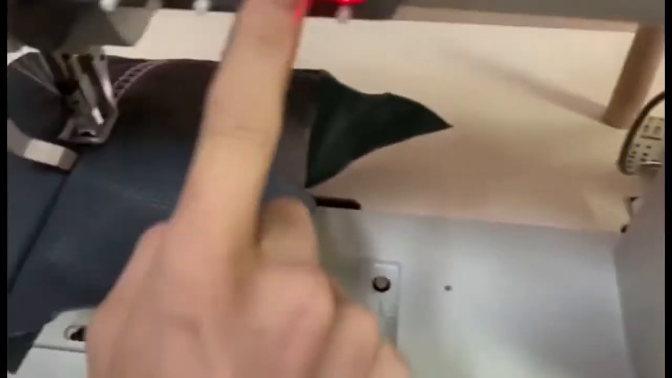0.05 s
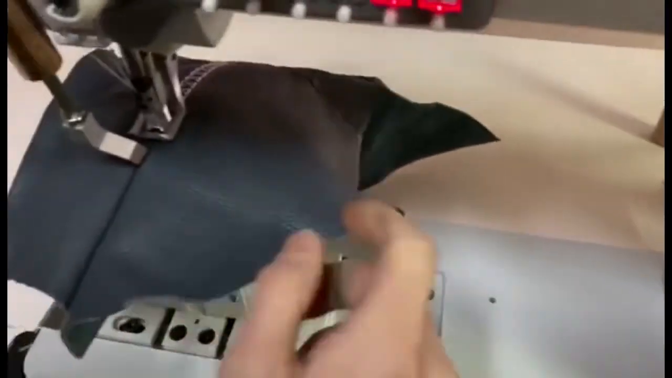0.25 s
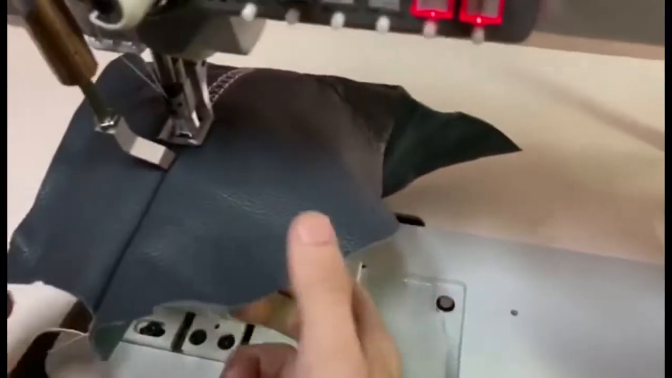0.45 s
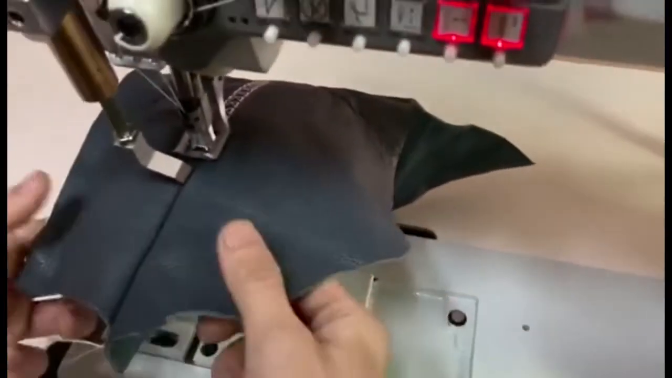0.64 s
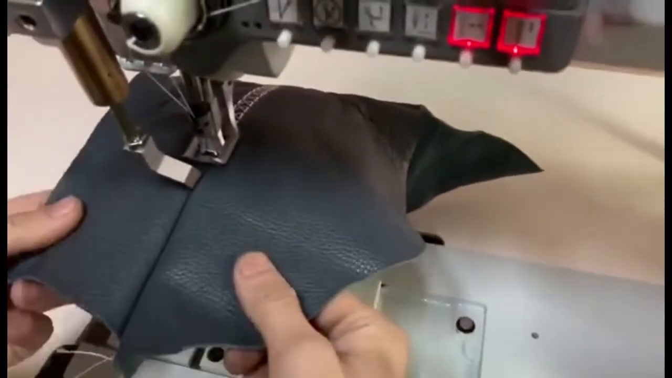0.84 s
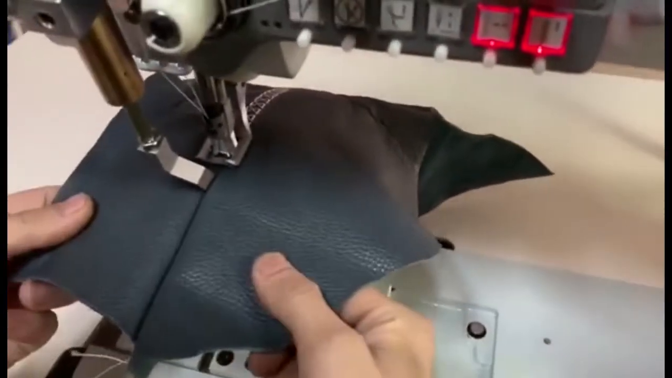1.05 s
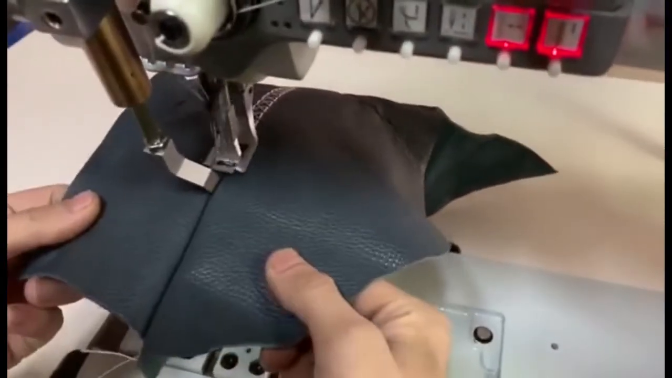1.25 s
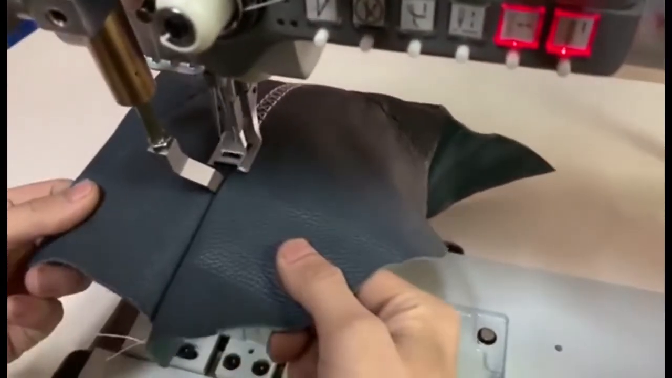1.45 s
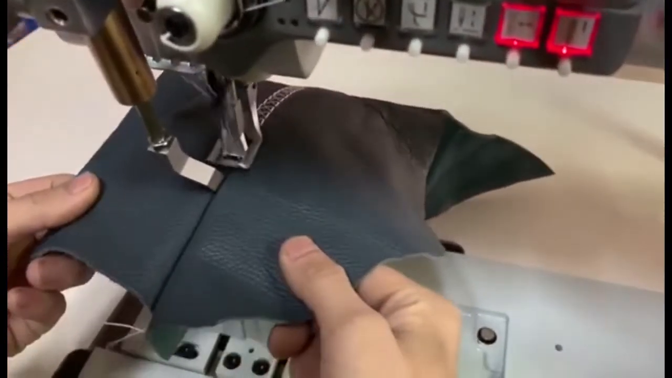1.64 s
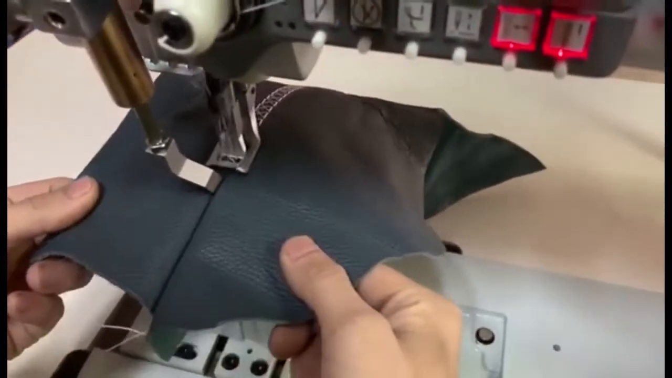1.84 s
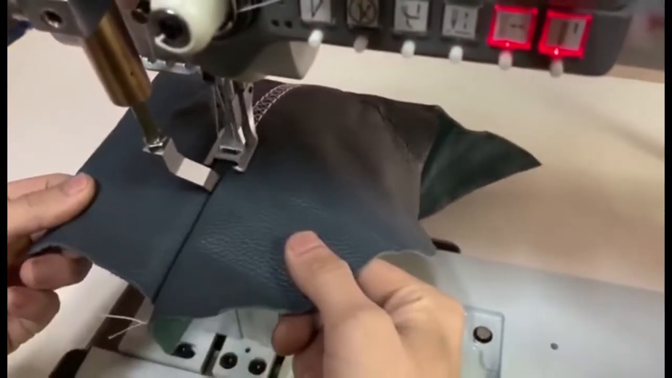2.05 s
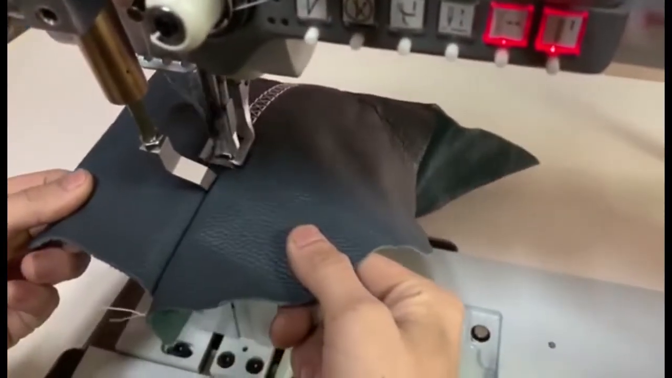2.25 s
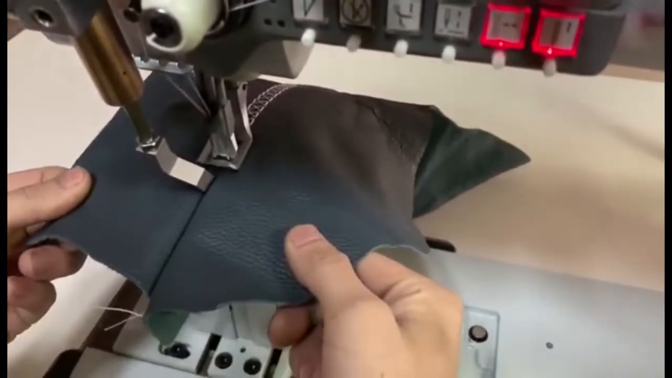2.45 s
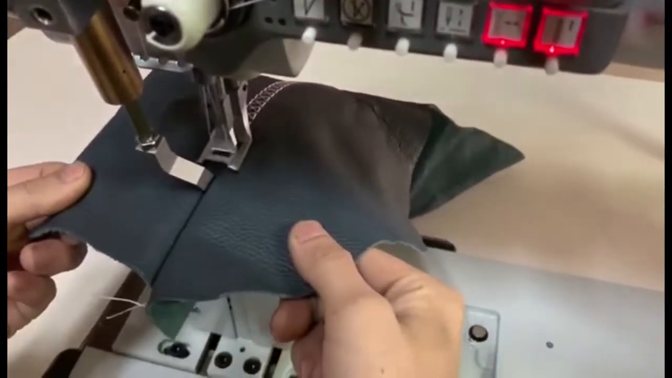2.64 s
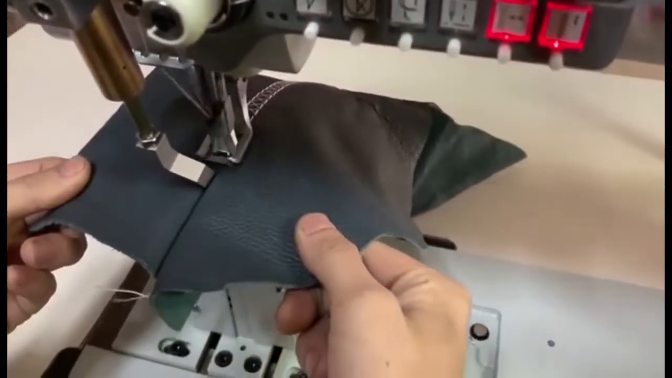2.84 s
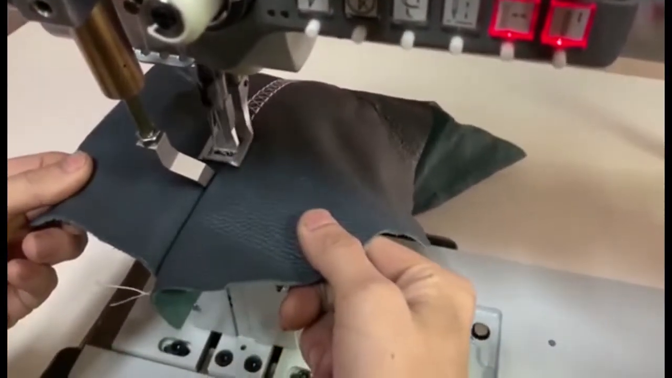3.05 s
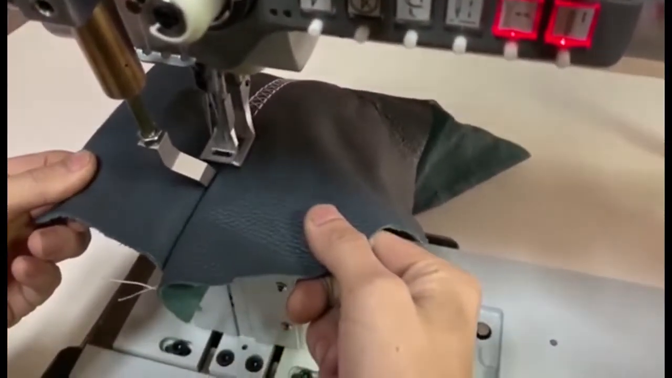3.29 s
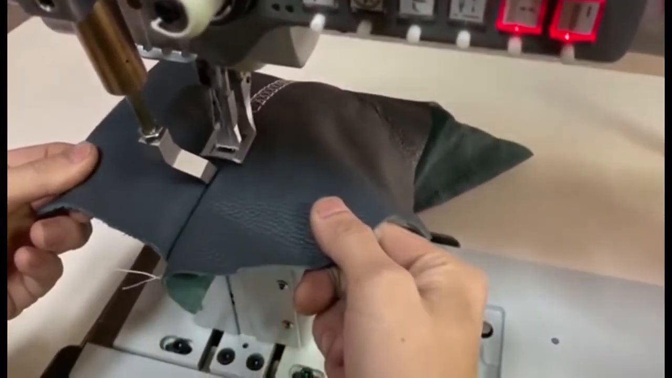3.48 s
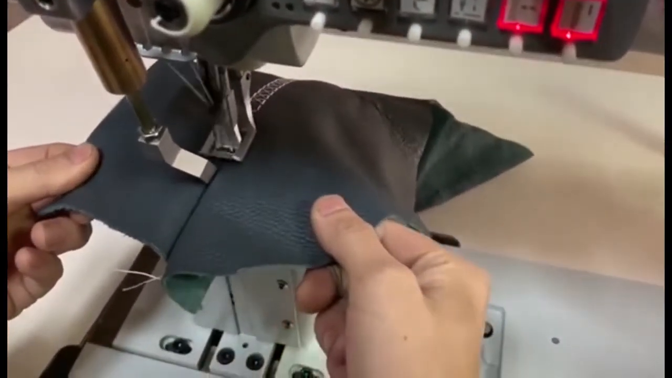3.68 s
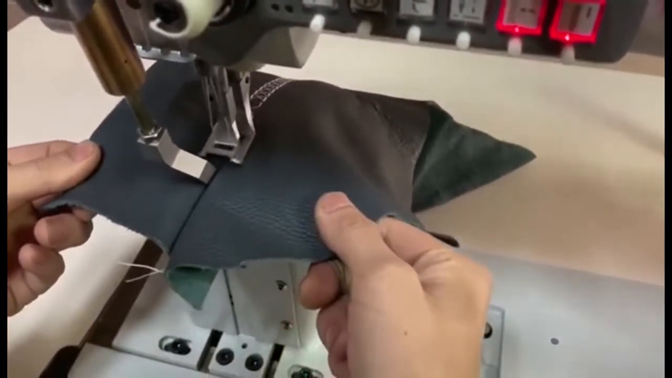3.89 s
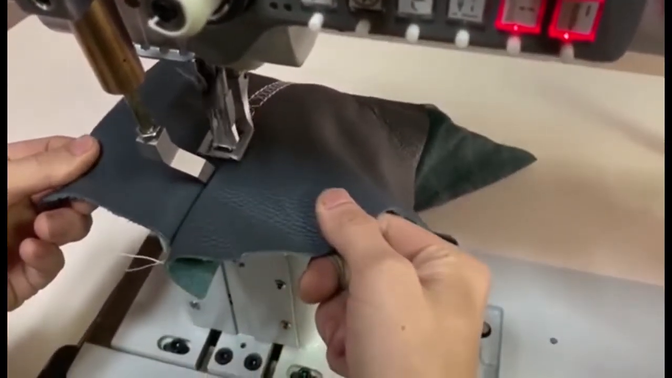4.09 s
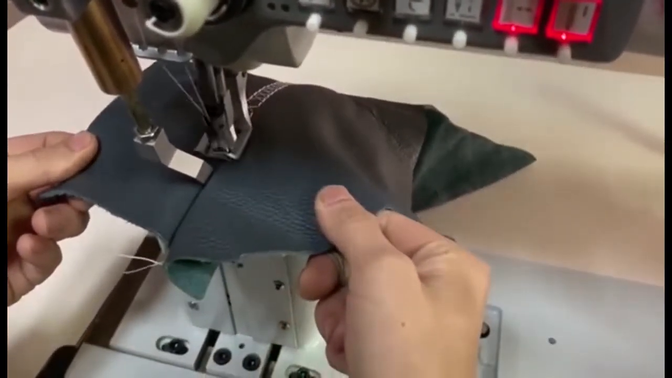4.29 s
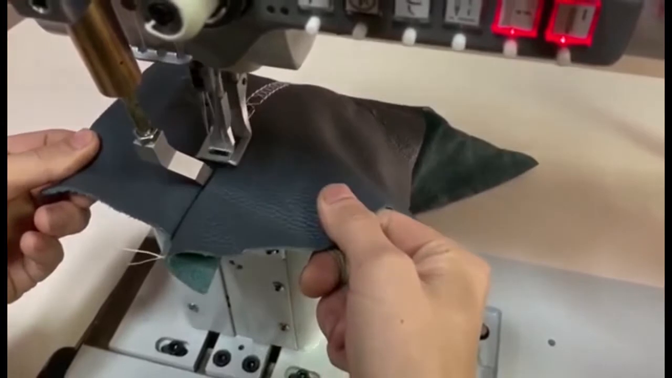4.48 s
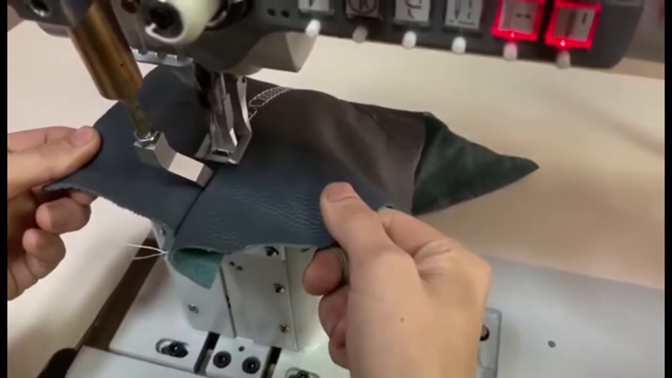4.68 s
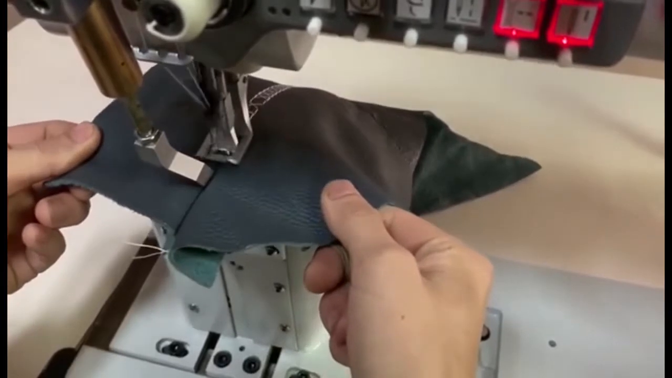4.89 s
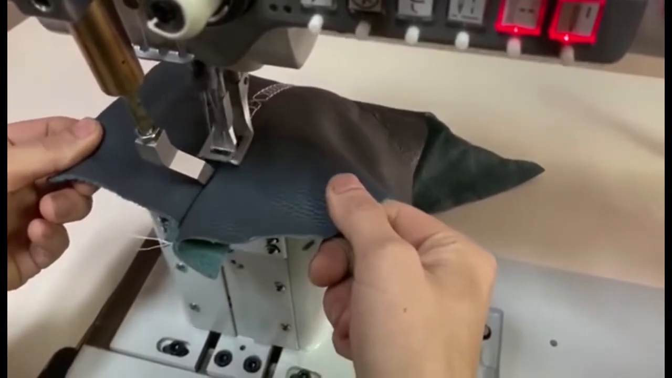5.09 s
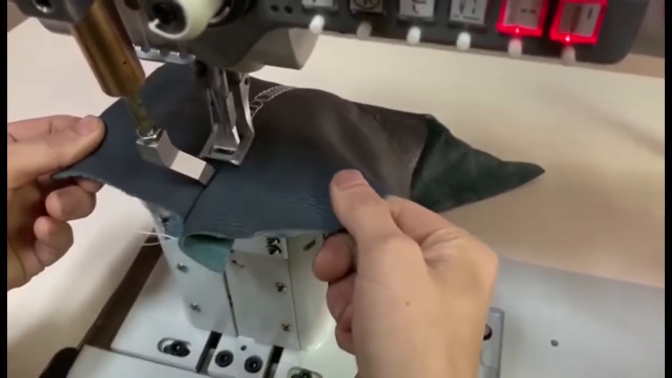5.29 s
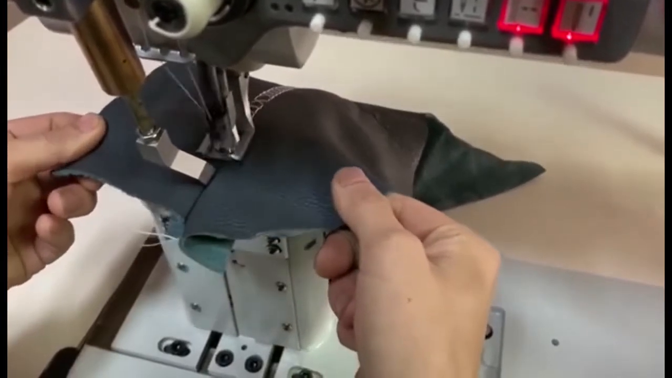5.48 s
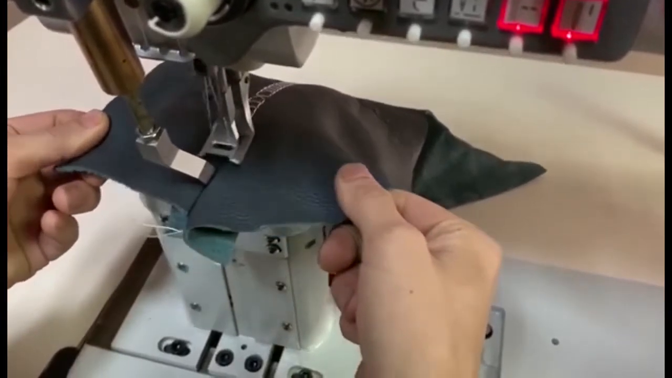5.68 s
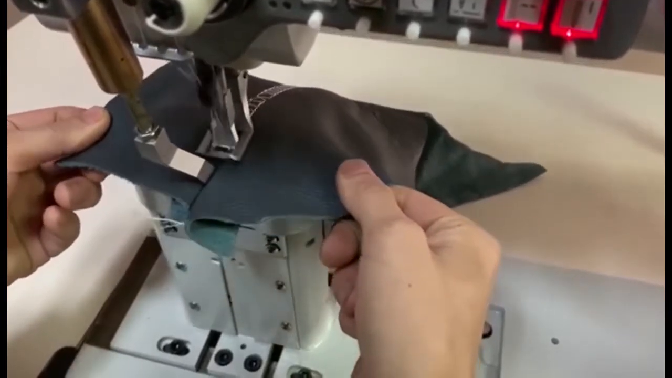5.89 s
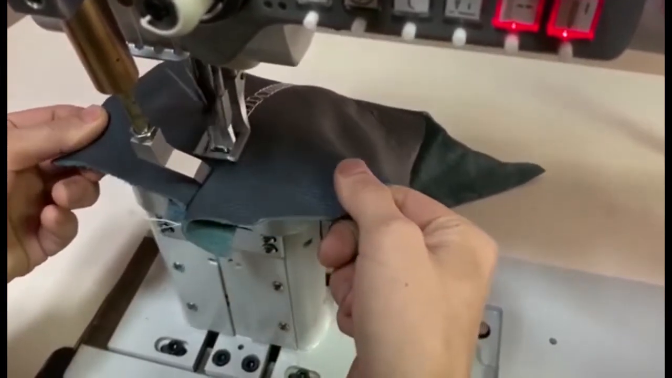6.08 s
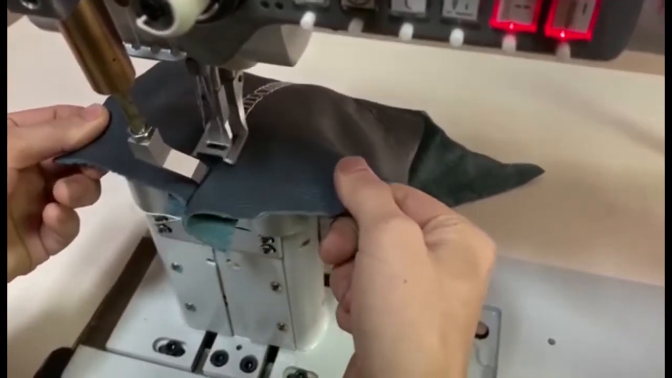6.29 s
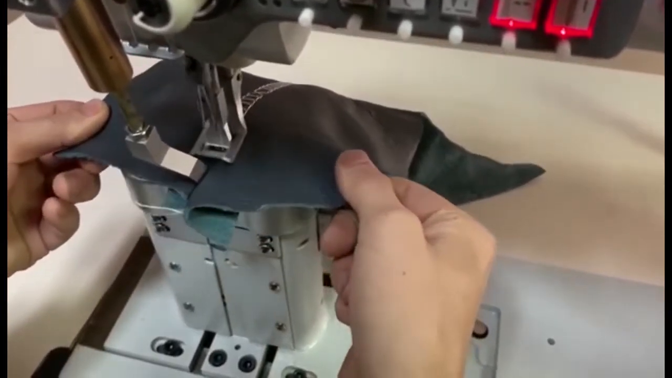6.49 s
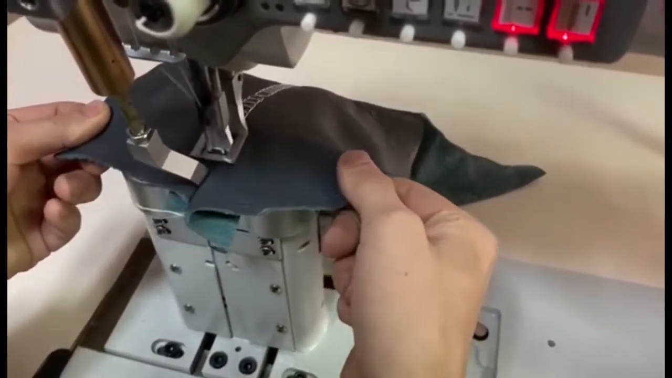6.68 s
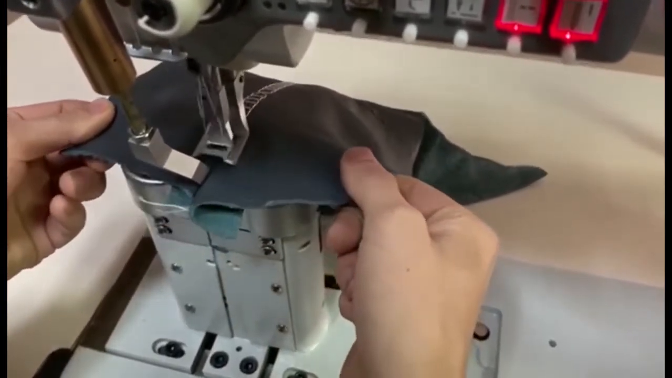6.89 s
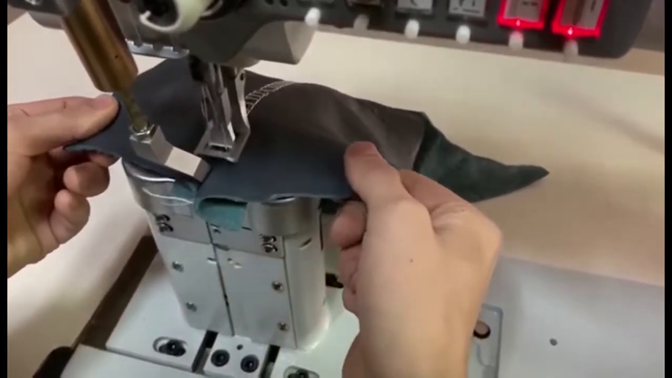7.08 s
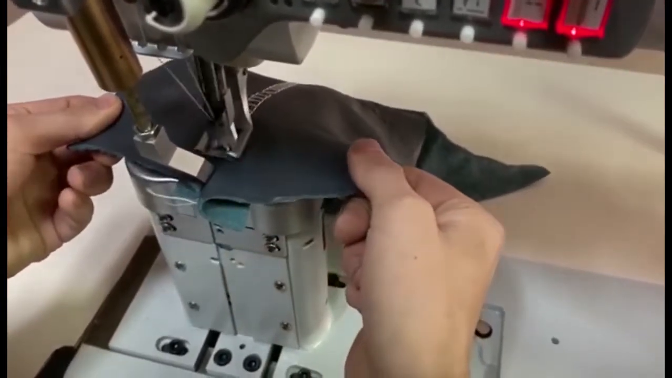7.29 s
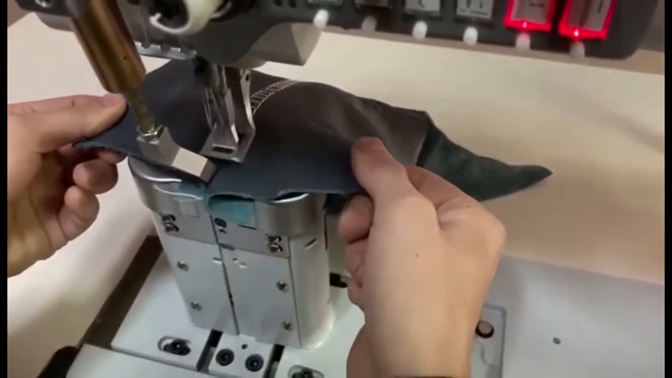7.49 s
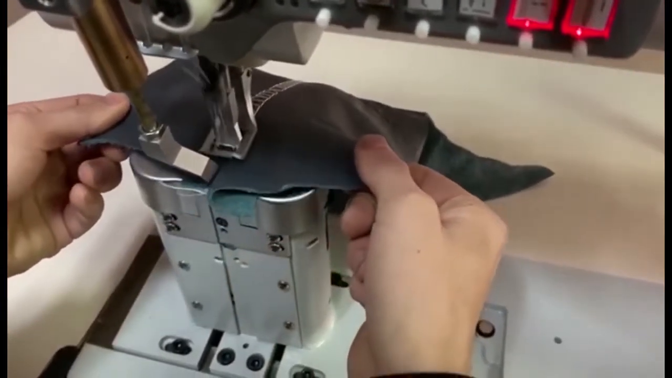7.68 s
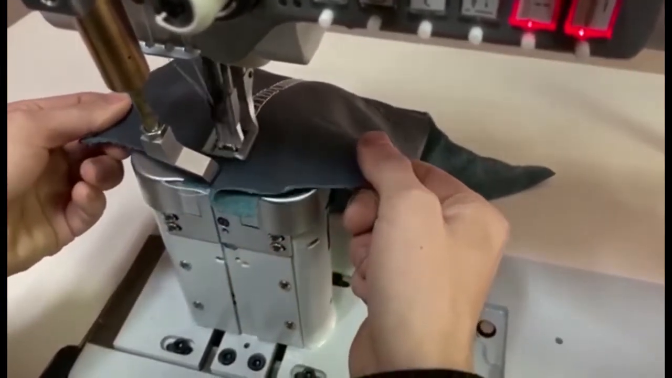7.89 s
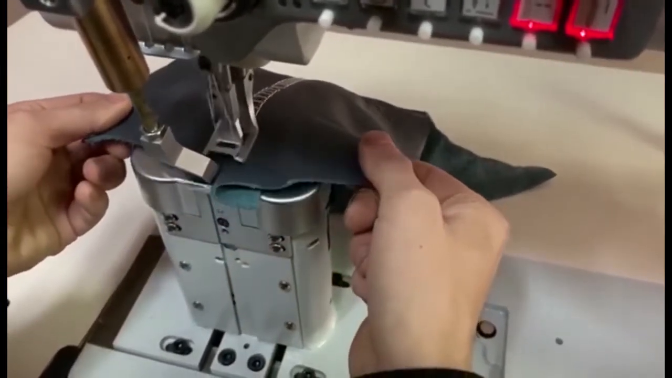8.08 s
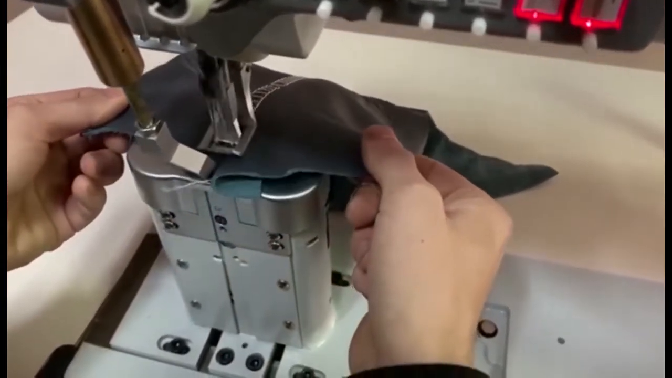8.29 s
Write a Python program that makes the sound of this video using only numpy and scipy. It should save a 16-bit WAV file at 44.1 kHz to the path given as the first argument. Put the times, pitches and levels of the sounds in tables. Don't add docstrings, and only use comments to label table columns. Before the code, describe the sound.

A heavy sewing machine drones, then stitches leather slowly and evenly, each turn a sharp metal click, a gritty needle punch and a hissing scrape.

```python
import sys
import numpy as np
from scipy import signal
from scipy.fft import rfft, irfft
from scipy.io import wavfile
from scipy.ndimage import uniform_filter1d

SR = 44100
rng = np.random.default_rng(int(sys.argv[2]) if len(sys.argv) > 2 else 0)


def put_to_file(sound):
    columns = np.atleast_2d(sound).T
    safe = np.clip(columns, -1, 1)
    whole_steps = np.round(safe * 32767)
    wavfile.write(sys.argv[1], SR, whole_steps.astype(np.int16))


def gain_from_decibels(decibels):
    exponent = np.asarray(decibels, float) / 20
    return 10 ** exponent


N = 367794

# (start [s], punch [dB], punch hiss over punch [dB], hook [dB], hook hiss over hook [dB])
TURNS = [(0.7655, -46, -11.5, -21.5, -8.5), (1.3662, -14, -13, -23.5, -7.5),
         (1.9643, -16.5, -11.6, -22.5, -6), (2.5652, -15.5, -12.5, -21.6, -8),
         (3.1654, -15, -13, -21.5, -7.5), (3.7662, -16, -11, -21, -8.5), (4.3653, -17.5, -10.1, -23, -8),
         (4.967, -16, -12.1, -22.5, -7.5), (5.5668, -17, -10, -21.5, -10), (6.1676, -18, -8, -20.5, -10.5),
         (6.767, -16, -10, -23, -6.5), (7.3682, -17, -11, -22, -9), (7.9684, -15.5, -11, -34.5, -0.5)]
# (frequency [Hz], width [Hz], level [dB])
HOOK_HISS = [(5040, 490, -14.5), (5780, 420, -4), (6450, 330, -4), (7290, 310, 2.5)]
# (time [s], drone [dB], rumble [dB], workshop wash [dB], gear whirr [dB])
RUNNING = [(0.0, -33.5, -25, -30.5, -44), (0.25, -35.5, -27, -34, -52.5), (0.44, -24, -24.5, -27, -42.5),
           (0.56, -30, -25, -28, -44), (0.67, -23, -30.5, -30, -53.5), (0.72, -33.5, -26.5, -29.5, -48.5),
           (0.97, -35, -29, -36, -54), (1.09, -28, -25, -30, -41.5), (1.28, -27, -23.5, -28.5, -38.5),
           (1.46, -28.5, -20, -24, -37), (1.51, -31.5, -19.5, -27.5, -39.5), (1.74, -25.5, -21, -29.5, -44),
           (1.92, -33.5, -26, -33.5, -44), (1.97, -28.5, -21, -27.5, -36.5),
           (2.14, -33.5, -20.5, -31.5, -44), (2.23, -22, -23, -26, -44), (2.42, -36, -23, -30, -40.5),
           (2.51, -24.5, -22.5, -29.5, -37), (2.69, -23.5, -23, -27.5, -42), (3.04, -28, -21.5, -31.5, -43),
           (3.11, -23.5, -29, -28, -41.5), (3.32, -25.5, -26.5, -29.5, -42),
           (3.39, -19.5, -25, -28.5, -41.5), (3.55, -31.5, -19, -29.5, -40.5), (3.69, -23, -21, -29, -40.5),
           (3.83, -30.5, -24, -27.5, -38), (4.02, -21.5, -25, -28, -40.5), (4.25, -29, -24, -29.5, -42),
           (4.62, -27, -22.5, -28, -41), (4.88, -30, -24, -27.5, -40), (5.04, -27, -23, -26, -41),
           (5.29, -33.5, -23.5, -31, -43), (5.46, -31, -31.5, -27.5, -40), (5.87, -29, -20, -30, -41),
           (5.94, -38.5, -22.5, -28.5, -46.5), (6.06, -29.5, -24, -31.5, -42.5),
           (6.15, -38, -21.5, -25.5, -38), (6.2, -22, -21, -28.5, -40), (6.37, -36, -23, -29.5, -42),
           (6.43, -21.5, -24, -32, -46), (6.5, -36.5, -24, -28, -43), (6.57, -30, -26.5, -35.5, -45),
           (6.67, -39, -22, -31, -42.5), (6.88, -33, -23, -29.5, -41), (7.02, -21, -23, -27.5, -44),
           (7.22, -33, -22, -30, -40), (7.43, -30, -19, -26.5, -39), (7.55, -38, -23.5, -30, -43),
           (7.62, -21.5, -22, -31, -42.5), (7.85, -38.5, -23, -30.5, -41.5), (8.01, -24.5, -21, -27, -40),
           (8.13, -37, -23.5, -33.5, -39), (8.22, -21, -21.5, -26, -42), (8.34, -30, -22, -29.5, -42)]


def evened(x):
    return x / np.sqrt(np.mean(x ** 2) + 1e-20)


def read(points, hz):
    f, value = np.transpose(points)
    return np.interp(np.log(hz + 1), np.log(f + 1), value)


def add(mix, s, sound):
    part = mix[..., round(s * SR):][..., :sound.shape[-1]]
    part += sound[..., :part.shape[-1]]


def ring(x, modes, skirt_db=-60, lo_hz=400, hi_hz=7700):
    hz = np.fft.rfftfreq(x.shape[-1], 1 / SR)
    response = 0
    for k, (f, width, db) in enumerate(modes):
        response = response + (-1) ** k * gain_from_decibels(db) / (1 + 2j * (hz - f) / width)
    skirt = 1j * hz / lo_hz / (1 + 1j * hz / lo_hz) / (1 + 1j * hz / hi_hz)
    response = response + gain_from_decibels(skirt_db) * skirt
    response = response / (1 + (lo_hz / (hz + 1)) ** 4) / (1 + (hz / hi_hz) ** 4)
    response = response / np.sqrt(np.mean(abs(response) ** 2))
    return irfft(rfft(x) * response, x.shape[-1])


def ports(pair, same, right_db=0.):
    # (frequency [Hz], lead [radians])
    lead = [(0, -1.5), (340, 1), (950, 0.5), (1380, 3.5), (1810, 4), (2760, 10), (3530, 11.5), (3960, 15),
            (4220, 13.5), (5000, 14), (6030, 19.5), (6370, 17.5), (6720, 21), (7320, 17)]
    hz = np.fft.rfftfreq(pair.shape[-1], 1 / SR)
    likeness = np.clip(same if np.isscalar(same) else read(same, hz), 0, 1)
    left, other = rfft(pair)
    later = left * np.exp(-1j * np.interp(hz, *np.transpose(lead)))
    right = likeness * later + np.sqrt(1 - likeness ** 2) * other
    return np.array([pair[0], gain_from_decibels(right_db) * irfft(right, pair.shape[-1])])


def rattle(grit_db):
    unevenness = np.minimum(rng.exponential(1, N), 4)
    return evened(rng.standard_normal((2, N)) * gain_from_decibels(grit_db * unevenness))


def contacts(rows, body_db, hiss_db, loose_db, loose_s):
    power = np.zeros((2, N))
    t = np.arange(-.06, .12, 1 / SR)
    for turn, body, hiss in zip(TURNS, body_db, hiss_db):
        chance = rng.standard_normal((len(rows), 2))
        for (delay, b, h, rise, fall), (louder, later) in zip(rows, chance):
            shape = np.exp(np.where(t < 0, t / rise, -t / fall))
            level = np.array([[body + b], [hiss + h]]) + loose_db * louder
            start = turn[0] + delay + t[0] + loose_s * later
            add(power, start, (gain_from_decibels(level) * shape) ** 2)
    return np.sqrt(power)


def needle_punch():
    # (delay [s], body [dB], hiss [dB], rise time [s], fall time [s])
    contact_rows = [
        (.236, -17, -10, 0.0036, 0.0094),
        (.254, -3, -2, .005, 0.011),
        (.270, 3.5, 0, .004, .009),
        (.29, -10, -14.5, 0.0069, 0.023),
    ]
    # (frequency [Hz], width [Hz], level [dB])
    head = [(572, 34, -6), (1493, 57, -4), (1734, 36, -6.5), (1985, 26, -7.5), (2486, 23, -9),
            (2938, 41, -6.5), (3275, 46, -11.5), (3460, 77, -15.5), (3806, 56, -15.5), (4300, 41, -17.5)]
    # (frequency [Hz], width [Hz], level [dB])
    hiss_modes = [(5400, 150, 0), (6450, 160, 1.5), (7250, 550, -7.5)]
    _, punch, hiss_over, _, _ = np.transpose(TURNS)
    body, hiss = contacts(contact_rows, punch, punch + hiss_over, loose_db=1.0, loose_s=.001)
    knock = ring(body * rattle(3.), head, -17.5, 450, 4010)
    return knock + ring(hiss * rattle(2.4), hiss_modes, -24.5, 4200, 9000)


def hook_scrape():
    # (delay [s], body [dB], hiss [dB], rise time [s], fall time [s])
    contact_rows = [
        (.374, -9.5, -5, .003, 0.0093),
        (.394, 1.5, 2.5, 0.0078, .004),
        (.401, 2.5, 2.5, .002, .008),
    ]
    # (frequency [Hz], width [Hz], level [dB])
    head = [(960, 160, -2), (1705, 52, 4.5), (1880, 17, -6), (2480, 60, -0.5), (3540, 82, -7.5)]
    _, _, _, hook, hiss_over = np.transpose(TURNS)
    body, hiss = contacts(contact_rows, hook, hook + hiss_over, loose_db=0.0, loose_s=0.0011)
    scrape = ring(body * rattle(3.4), head, -9, 1200, 3700)
    return scrape + ring(hiss * rattle(3.3), HOOK_HISS, -15, 4200, 9000)


def linkage_ticks():
    # (delay [s], body [dB], hiss [dB], rise time [s], fall time [s])
    contact_rows = [(.024, -28.5, -40.5, 0.0014, 0.011), (.092, -37.5, -44.5, 0.0046, .004),
                    (.101, -34.5, -39.5, 0.0018, .008), (.128, -30.5, -41, .002, 0.0085),
                    (.170, -35.5, -41, 0.0027, .008), (.207, -54.5, -46.5, 0.0011, 0.0034),
                    (.325, -48, -41.5, .002, 0.0065), (.474, -48, -48, 0.011, .003),
                    (.545, -36, -40, 0.01, 0.022), (.566, -29.5, -36, 0.0012, .005)]
    # (frequency [Hz], width [Hz], level [dB])
    rods = [(1720, 93, -1), (2033, 120, -3), (2730, 130, -9.5), (3340, 270, -10)]
    start = np.transpose(TURNS)[0]
    level = np.where(start < 1.2, -9., 0.)
    body, hiss = contacts(contact_rows, level, level, loose_db=1.0, loose_s=0.0013)
    moving = np.arange(N) > 1.05 * SR
    tick = ring(moving * body * rattle(4.3), rods, -13.5, 1200, 4600)
    return tick + ring(moving * hiss * rattle(3.9), HOOK_HISS, -4.5, 4200, 7600)


def mechanism():
    return gain_from_decibels(3.0) * ports(needle_punch() + hook_scrape() + linkage_ticks(), 0.67, right_db=1.14)


def clicks():
    # (time [s], peak [dB], ring [Hz], low ring over ring [dB], hiss over ring [dB], left over right [dB])
    events = [(1.054, -31.5, 3410, -16, -6.5, -2), (1.387, -33.5, 3330, -8, -9, -5.5),
              (1.9657, -6.5, 3240, -8.5, -31, -2), (2.5639, -9, 3420, -12, -25, 3.5),
              (3.1662, -11.5, 3400, -13, -21.5, 2), (3.7652, -11, 3360, -13, -20, -7),
              (4.367, -10.5, 3390, -9, -26, -8.5), (4.964, -10, 3360, -15.5, -28, 3.5),
              (5.5662, -10.5, 3300, -12.5, -20.5, 0.0), (6.1659, -12, 3340, -14, -19, -5.5),
              (6.7695, -12, 3410, -9.5, -19.5, -2.5), (7.3673, -12.5, 3340, -10.5, -18.5, -1),
              (7.9698, -18.5, 3460, -0.5, -9.5, 1.5)]
    # (frequency [Hz], width [Hz], level [dB])
    low_modes = [(1070, 150, -12.5), (1720, 150, -1.5), (2060, 250, -6.5), (2250, 240, -10.5)]
    out = np.zeros((2, N))
    t = np.arange(-.01, .08, 1 / SR)
    bright_shape = np.exp(-abs(t - .001) / 0.0014)
    dull_shape = np.exp(-abs(t - .002) / 0.0027)
    puff_shape = np.exp(np.where(t < 0, t / 0.0026, -t / 0.0079))
    for s, db, hz, low, hiss, pan in events:
        blows = rng.standard_normal((3, 2, len(t)))
        bright_modes = [(hz, 170, 0), (hz * 0.94, 200, -9), (hz * 0.88, 250, -7)]
        bright = ring(blows[0] * bright_shape, bright_modes)
        dull = ring(blows[1] * dull_shape, low_modes)
        puff = ring(blows[2] * puff_shape, HOOK_HISS, -17.5, 4200, 9000)
        bright, dull, puff = [part / abs(part).max(1, keepdims=True) for part in (bright, dull, puff)]
        sound = bright + gain_from_decibels(low + 7.5) * dull + gain_from_decibels(hiss + 6.5) * puff
        sides = gain_from_decibels([[pan / 2], [-pan / 2]])
        add(out, s + t[0], gain_from_decibels(db + 5.0) * ports(sound, 0.78) * sides)
    return out


def thuds():
    # (time [s], level [dB])
    blows = [(1.301, -19), (1.6, -22.1), (1.9, -26), (2.2, -15.5), (2.503, -21), (2.801, -16), (3.101, -19),
             (3.401, -15), (3.7, -22), (4.001, -18.5), (4.301, -29.5), (4.602, -17.5), (4.901, -21),
             (5.201, -20.5), (5.502, -18), (5.803, -19), (6.102, -21), (6.404, -20), (6.702, -18.5),
             (7.003, -16), (7.304, -29), (7.604, -21), (7.903, -24), (8.204, -26.0)]
    # (frequency [Hz], level [dB], time to fall by 60 dB [s])
    table = [(72, -10, 0.15), (99, -10, 0.22), (123.1, 4, 0.57), (152, -7.5, 0.16), (203, -14.5, .2)]
    # (frequency [Hz], level [dB], time to fall by 60 dB [s])
    rebound = [(86, -8, .1), (123, 0, 0.44), (200.8, 7, 0.19), (270, -6, 0.089), (580, -13.5, .1)]
    out = np.zeros(N)
    t = np.arange(0, .5, 1 / SR)
    onset = 1 - np.exp(-t / 0.0017)
    for s, db in blows:
        for modes, delay, rel_db in ((table, 0, -4.), (rebound, .035, -5.)):
            chance = rng.standard_normal((len(modes), 2))
            thud = np.zeros(len(t))
            for (f, level, t60), (louder, sharper) in zip(modes, chance):
                fading = gain_from_decibels(level + 1.6 * louder - 60 * t / t60)
                thud += fading * np.sin(2 * np.pi * f * (1 + 0.013 * sharper) * t)
            add(out, s + delay, gain_from_decibels(db + rel_db) * thud * onset)
    return ports(np.array([out, np.roll(out, 300)]), 1.0, right_db=1.5)


def squeaks():
    # (time [s], level [dB])
    chirps = [
        (1.385, -56.5),
        (5.93, -52),
        (7.005, -52),
    ]
    out = np.zeros((2, N))
    size = 1800
    near = abs(np.fft.rfftfreq(size, 1 / SR) - 14250) < 480
    for s, db in chirps:
        hiss = ring(rng.standard_normal(size), [(14000, 150, 0), (14250, 250, -4)], -80, 13700, 14800)
        chirp = evened(irfft(rfft(hiss) * near, size)) * np.hanning(size)
        add(out[1], s - size / SR / 2, gain_from_decibels(db) * chirp)
    return out


def motor_drone():
    # (time [s], frequency [Hz])
    pitch = [(0, 295), (1.0, 290), (1.1, 262), (2.2, 268), (3.4, 272), (4.2, 282), (5.5, 282), (6.5, 272),
             (8.34, 282)]
    t = np.arange(N) / SR
    s, level, *_ = np.transpose(RUNNING)
    cycles = np.cumsum(np.interp(t, *np.transpose(pitch))) / SR
    spin = np.exp(2j * np.pi * cycles)
    noise = rng.standard_normal((2, N)) + 1j * rng.standard_normal((2, N))
    fuzz = signal.lfilter([1], [1, -np.exp(-np.pi * 26. / SR)], noise)
    fuzz = fuzz / abs(fuzz) ** 0.64
    hum = gain_from_decibels(np.interp(t, s, level) + 1.0) * evened((fuzz * spin).real)
    return ports(hum, .9, right_db=1.5)


def workshop():
    # (frequency [Hz], level per Hz [dB])
    color = [(18, -59), (30, -27), (129, -3), (225, -7.5), (277, -4.5), (554, -15), (988, -16.5),
             (1400, -20.5), (1720, -22.5), (2670, -25.5), (3530, -29), (7570, -38), (9840, -62),
             (16700, -120)]
    # (frequency [Hz], likeness [0 to 1])
    same = [(60, 1), (150, 0.91), (280, 0.79), (500, .5), (1000, 0.29), (7000, 0.23)]
    frames, hz = N // 256 + 5, np.fft.rfftfreq(1024, 1 / SR)
    s, _, *levels = np.transpose(RUNNING)
    rumble, wash, whirr = [np.interp(np.arange(frames) * 256 / SR, s, level) for level in levels]
    a, b, c, d, patches = rng.standard_normal((frames, len(hz), 5)).T
    patches = evened(uniform_filter1d(uniform_filter1d(patches, 8, 0), 10, 1))
    tilt = gain_from_decibels(read(color, hz))
    bands = np.digitize(hz, [450, 3500])
    shape = np.zeros((len(hz), frames))
    for k, level in enumerate((rumble - 1.5, wash + 0.18, whirr + 0.34)):
        band = bands == k
        shape[band] = tilt[band, None] / np.linalg.norm(tilt[band]) * gain_from_decibels(level)
    spectrum = np.array([a + 1j * b, c + 1j * d]) * shape * gain_from_decibels(2.47 * patches)
    noise = signal.istft(spectrum, nperseg=1024, noverlap=768)[1][:, :N] * 0.96
    return ports(noise, same, right_db=0.9)


def scene():
    return mechanism() + clicks() + thuds() + squeaks() + motor_drone() + workshop()


def top_cut(x):
    return signal.sosfilt(signal.butter(12, 7720, fs=SR, output="sos"), x)


def record(dry):
    hz = np.fft.rfftfreq(N, 1 / SR)
    below_edge = np.clip((7700 - hz) / 150 + .5, 0, 1)
    chirp_band = abs(hz - 14250) < 500
    limited = irfft(rfft(dry) * (below_edge + chirp_band), N)
    return top_cut(np.clip(limited, -1, 1))


dry = scene()
out = record(dry)
put_to_file(out)
```